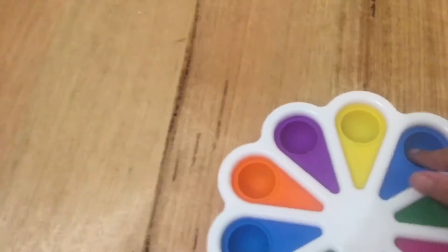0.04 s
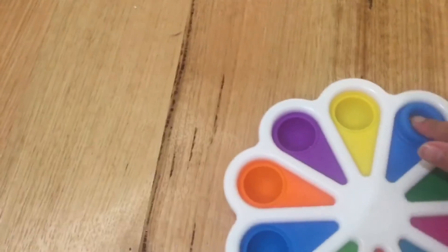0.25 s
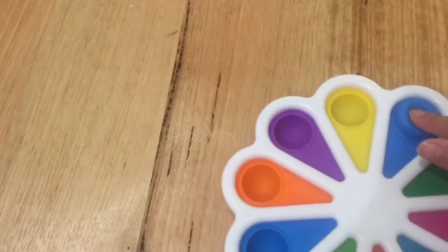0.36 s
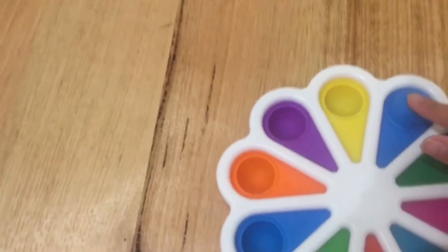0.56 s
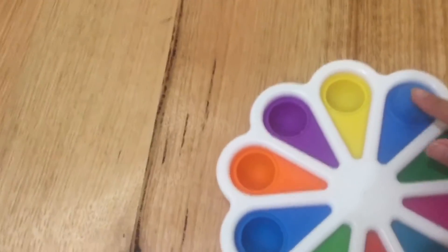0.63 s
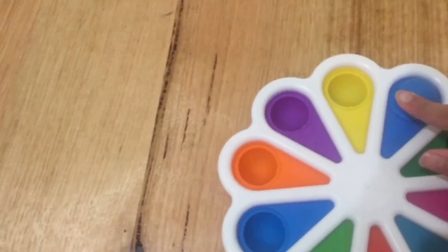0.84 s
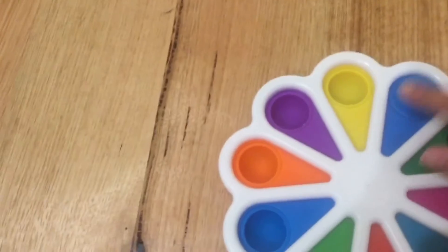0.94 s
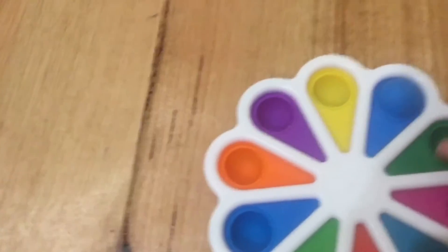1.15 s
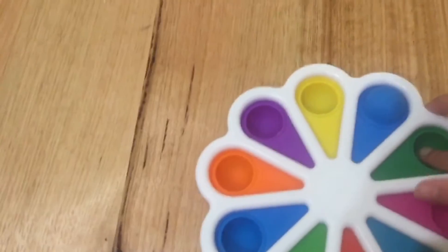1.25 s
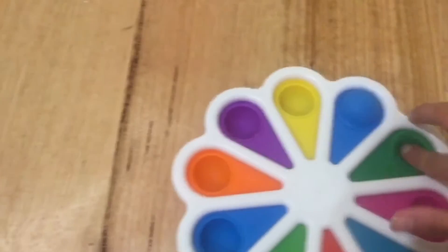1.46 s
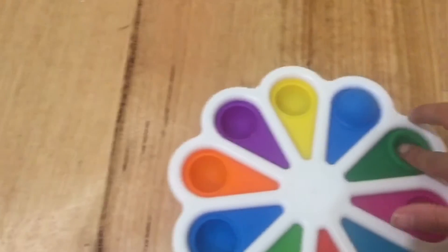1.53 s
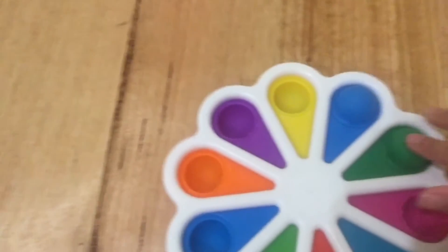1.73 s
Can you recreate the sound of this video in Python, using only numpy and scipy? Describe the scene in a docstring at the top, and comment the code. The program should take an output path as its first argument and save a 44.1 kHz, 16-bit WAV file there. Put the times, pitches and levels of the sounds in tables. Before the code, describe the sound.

Push-pop fidget toy played backwards: one loud pop swelling up, then faint crackles and knocks

```python
"""Silicone push-pop toy, reversed

A push-pop toy on a wooden table, close by, heard backwards: rings and room tails swell up to their blows.
One loud dome pop and three fainter ones, frame knocks and a fingertip tap are noise bursts that drive
decaying modes; skin crackles are filtered bursts; the table top thumps at low pitch. Noise shaped in
level and spectrum gives rubbing, rustle, narrow hisses and room air; swelling sine partials give a hum.
"""
import sys
import numpy as np
from scipy import signal
from scipy.fft import rfft, irfft
from scipy.io import wavfile
from scipy.ndimage import uniform_filter1d

SR = 44100
rng = np.random.default_rng(int(sys.argv[2]) if len(sys.argv) > 2 else 0)


def to_wav(sig):
    """Store sig (one row per channel, or 1-D mono) as 16-bit WAV at the path in sys.argv[1].

    Samples outside -1..1 are clipped; the rate is SR.
    """
    pcm = np.clip(np.atleast_2d(sig), -1, 1) * 32767
    pcm = np.round(pcm).astype(np.int16)
    wavfile.write(sys.argv[1], SR, pcm.T)  # frames by channels


def attenuation_scalar(level_db):
    """Turn a level in dB into a linear amplitude multiplier (20 dB per decade)."""
    decades = np.asarray(level_db, float) / 20
    return 10 ** decades


N = 79380
M = N + int(0.1 * SR)  # forward-running buffer, 0.1 s longer than the scene
TIME_S = np.arange(N) / SR


def band(x, hz, width_hz):
    """Two-pole resonant band-pass."""
    hz = min(hz, 0.4 * SR)
    return signal.lfilter(*signal.iirpeak(hz, hz / width_hz, fs=SR), x)


def unit(x):
    """Scale to rms 1."""
    return x / np.sqrt(np.mean(x ** 2))


def peak(x, db):
    """Scale to a peak level."""
    return attenuation_scalar(db) * x / np.abs(x).max()


def coloured(shape):
    """Noise of rms 1 with a (Hz, dB) spectrum, interpolated over log frequency."""
    freq_hz = np.fft.rfftfreq(N, 1 / SR) + 1
    shape_hz, shape_db = np.array(shape).T
    white = rng.standard_normal(N)
    gain = attenuation_scalar(np.interp(np.log(freq_hz), np.log(shape_hz), shape_db))
    return unit(irfft(rfft(white) * gain, N))


def walk(rate_hz):
    """Smooth random level, rms 1: noise averaged twice over 1 / rate_hz."""
    k = int(SR / rate_hz)
    return unit(uniform_filter1d(uniform_filter1d(rng.standard_normal(N), k), k))


def contour(points):
    """Level in dB at every sample, straight lines between (time, level) points."""
    return np.interp(TIME_S, *np.array(points).T)


def swell(start_s, end_s):
    """Half-sine rise and fall between two times."""
    return np.sin(np.pi * np.clip((TIME_S - start_s) / (end_s - start_s), 0, 1))


def ring(modes):
    """Impulse response of a struck body: decaying sine modes, peak 1."""
    t = np.arange(SR // 2) / SR
    y = sum(attenuation_scalar(db - 60 * t / t60_s) * np.sin(2 * np.pi * hz * t) for hz, db, t60_s in modes)
    return y / np.abs(y).max()


def burst(length_ms, rise_share=0.076):
    """Spray of micro-impacts under a Gaussian decay; the rise is a share of the length."""
    t = np.arange(SR // 10) / SR * 1000 / length_ms
    spray = rng.standard_normal(len(t)) * attenuation_scalar(3.5 * rng.standard_normal(len(t)))
    return spray * np.exp(-t ** 2) * np.clip(t / rise_share, 0, 1)


def add(out, at_s, x):
    """Place a forward-running sound whose start is heard at at_s when reversed."""
    i = M - int(at_s * SR)
    out[i:i + len(x)] += x[:M - i]


def room_tail(room_db):
    """Grainy diffuse tail that builds up after a gap; its treble starts stronger and dies sooner."""
    gap_s, t60_s, treble_t60_s, treble_db, split_hz = 0.015, 0.26, 0.17, 4.5, 3500
    # room spectrum: (frequency [Hz], level [dB per Hz])
    room_colour = [(120, -55.5), (200, -20), (832, -11.5), (912, -13.5), (1180, -3), (1640, -17.5),
                   (1970, -4), (2280, -17.5), (2780, -10), (3050, -23), (4310, -14.5), (5470, -23.5),
                   (15800, -26)]
    t = np.arange(SR // 2) / SR
    grainy = coloured(room_colour) * attenuation_scalar(1.5 * walk(250))
    air = grainy[:len(t)] * (1 - np.exp(-(t / gap_s) ** 2))
    low = signal.filtfilt(*signal.butter(2, split_hz, fs=SR), air)
    low_tail = low * attenuation_scalar(-60 * t / t60_s)
    treble_tail = (air - low) * attenuation_scalar(treble_db - 60 * t / treble_t60_s)
    return attenuation_scalar(room_db) * (low_tail + treble_tail)


def blows(events, modes, room_db, low_cut_hz=260):
    """Each snap rings the body, cracks in the treble and leaves a room tail."""
    crack_hz, crack_width_hz = 11000, 12000
    push_share = 0.67  # slower rise of the push that drives the body
    out = np.zeros(M)
    low_cut = signal.butter(2, low_cut_hz, "high", fs=SR)
    for at_s, db, length_ms, crack_db, tilt_db in events:
        tone = 0
        for mode in modes:
            hz, mode_db, _ = mode
            driven = signal.fftconvolve(burst(length_ms, push_share), ring([mode]))
            tone = tone + peak(driven, mode_db + tilt_db * np.log2(hz / 1000))
        crack = band(burst(length_ms), crack_hz, crack_width_hz)
        add(out, at_s, peak(signal.lfilter(*low_cut, tone), db))
        add(out, at_s, peak(crack, db + crack_db))
        add(out, at_s, room_tail(db + room_db))
    return out


def room_air():
    """Quiet room: coloured noise with a slight level drift."""
    # room air spectrum: (frequency [Hz], level [dB per Hz])
    air_colour = [(15, -53), (25, 3.5), (120, -4.5), (157, -8.5), (189, -9.5), (461, -12), (604, -15.5),
                  (857, -14), (1640, -20.5), (2030, -19), (15800, -23)]
    return attenuation_scalar(-68.5 + 0.68 * walk(8)) * coloured(air_colour)


def hum():
    """Swells of three harmonic sine partials, each wavering in level."""
    out = np.zeros(N)
    # hum swells: (start [s], end [s], fundamental [Hz], levels of partials 1, 2, 3 [dB])
    hum_swells = [(0.25, .38, 157, -66, -75, -79.5), (0.403, 0.583, 155.1, -68, -79.5, -73),
                  (.83, .95, 158.8, -66.5, -80, -88), (1.671, 1.753, 156, -65, -85, -85),
                  (1.713, 1.822, 156, -48, -75.5, -72)]
    for start_s, end_s, hz, *partial_db in hum_swells:
        for k, db in enumerate(partial_db, 1):
            level = attenuation_scalar(db + 2.0 * walk(12)) * swell(start_s, end_s)
            out += level * np.sin(2 * np.pi * k * hz * TIME_S)
    return out


def whistle():
    """Narrow hisses and a thin whistle: noise band-passed twice, swelling and fading."""
    out = np.zeros(N)
    # hisses: (start [s], end [s], centre [Hz], width of each pass [Hz], rms before the swell [dB])
    hisses = [(0.087, 0.126, 7200, 1800, -61.5), (0.039, 0.16, 2500, 2300, -63),
              (0.6, 0.87, 3570, 79, -71.5), (0.726, .825, 3700, 56, -71), (0.663, 0.82, 2925, 84, -70.5),
              (.66, 0.833, 3920, 350, -74.5), (.84, .92, 2650, 500, -69), (0.41, 0.74, 670, 700, -72.5),
              (1.40, 1.52, 1260, 250, -64), (1.73, 1.84, 2330, 1200, -64.5), (1.513, 1.57, 3660, 900, -64)]
    for start_s, end_s, hz, width_hz, db in hisses:
        once = band(rng.standard_normal(N), hz, width_hz)
        out += attenuation_scalar(db) * swell(start_s, end_s) * unit(band(once, hz, width_hz))
    return out


def rubbing():
    """Finger and frame rubbing: coloured noise with a fast grainy level."""
    # rubbing level: (time [s], level [dB])
    rub_level = [(0, -71), (.1, -70), (.3, -93.5), (.45, -74), (.5, -69), (.62, -69.5), (.7, -70),
                 (.74, -91), (1.0, -82.5), (1.1, -73), (1.13, -87.5), (1.27, -84), (1.31, -65.5),
                 (1.39, -69), (1.45, -67.5), (1.55, -58.5), (1.6, -50), (1.63, -85.5), (1.8, -59)]
    # rubbing spectrum: (frequency [Hz], level [dB per Hz])
    rub_colour = [(24, -32), (40, -5), (126, -7.5), (247, -18), (509, -20.5), (1050, -14), (1220, -15.5),
                  (2390, -20), (2990, -17), (4800, -29), (15500, -35)]
    return attenuation_scalar(contour(rub_level) + 2.8 * walk(79)) * coloured(rub_colour)


def rustle():
    """Dry treble rustle of skin on silicone: gritty noise through a wide band-pass."""
    # rustle level: (time [s], level [dB])
    rustle_level = [(0, -69), (.1, -66.5), (.14, -68), (.25, -57), (.27, -88), (.5, -70.5), (.7, -73),
                    (.8, -88), (1.28, -81.5), (1.32, -67.5), (1.4, -79), (1.5, -75.5), (1.555, -66),
                    (1.565, -60.5), (1.578, -49.5), (1.584, -59.5), (1.59, -52), (1.6, -60), (1.608, -46),
                    (1.613, -64), (1.64, -80.5), (1.8, -87)]
    grit = rng.standard_normal(N) * attenuation_scalar(2.5 * walk(300))
    return attenuation_scalar(contour(rustle_level)) * unit(band(grit, 13000, 13000))


def thumps():
    """The table top booms in its low modes, building up over a few milliseconds."""
    rise_s = 0.0051
    # table top modes: (frequency [Hz], level [dB], t60 [s])
    table_modes = [(64, 4, 0.17), (90, 4.5, 0.33), (110, 0, .2), (156, -7.5, .3)]
    # thumps: (time [s], level before the rise is applied [dB])
    thump_events = [(.235, -35), (.265, -45.5), (0.781, -62.5), (1.114, -56.5), (1.341, -55), (1.43, -49),
                    (1.491, -44), (1.55, -38.5), (1.61, -39.5), (1.69, -63), (1.81, -56)]
    out, boom = np.zeros(M), ring(table_modes)
    boom = boom * (1 - np.exp(-np.arange(len(boom)) / SR / rise_s))
    for at_s, db in thump_events:
        add(out, at_s, attenuation_scalar(db) * boom)
    return out


def ticks():
    """Skin peeling from the finger: short broad band-passed crackles."""
    out = np.zeros(M)
    # crackles: (time [s], peak level [dB], length [ms], centre [Hz])
    tick_events = [(.2352, -40.5, 1.7, 6460), (1.115, -43, 1.5, 6000), (1.6102, -35, 3.8, 13000),
                   (.2625, -32, 3, 13000), (.272, -82, 2, 5020), (.499, -64.5, 4, 6000),
                   (.565, -57, 3.5, 2925), (.609, -50, 1.84, 5950), (.626, -46.5, 1.5, 6955),
                   (.663, -65.5, 3, 8980), (.695, -56.5, 5, 3000), (1.329, -49, 14, 13500),
                   (1.3626, -44, 3, 5750), (1.5796, -38, .8, 5980), (1.5898, -31, 2, 11000),
                   (1.593, -26, .8, 8880), (1.620, -56, 2.88, 7950), (1.652, -57, 2.6, 6050)]
    for at_s, db, length_ms, hz in tick_events:
        add(out, at_s, peak(band(burst(length_ms), hz, 1.3 * hz), db))
    return out


def taps():
    """A fingertip tap rings the modes of the wood."""
    # taps: (time [s], peak level [dB], snap length [ms], treble crack re tap [dB], tilt [dB per octave])
    tap_events = [(1.115, -41.5, 0.88, -3.5, 0)]
    # wood modes: (frequency [Hz], peak level [dB], t60 [s])
    wood_modes = [(128, -10, 0.14), (220, -5, .06), (390, -3.5, 0.095), (575, -1, 0.027), (744, 3, 0.028),
                  (960, -10.5, 0.018), (1690, -3.5, 0.012), (2730, -7.5, 0.012)]
    return blows(tap_events, wood_modes, room_db=-31.5, low_cut_hz=79)


def knocks():
    """The frame knocks on the table and rings in its own modes."""
    # knocks: (time [s], peak level [dB], snap length [ms], treble crack re knock [dB], tilt [dB per octave])
    knock_events = [(1.414, -47.5, 3.8, -22.5, -1), (1.4905, -42, 6, -25, -2), (1.539, -39.5, 6, -20, -0.5),
                    (1.551, -32.5, 5.2, -17.5, -1), (1.577, -37, 3.76, -18, 2),
                    (1.5815, -40.5, 1.45, -3, -11.5), (1.5915, -42, 3.1, -2.5, 3),
                    (1.6105, -32.5, 3, -0.5, -1.5)]
    # frame modes: (frequency [Hz], peak level [dB], t60 [s])
    frame_modes = [(530, -6.5, 0.051), (724, -7.5, 0.014), (942, 0.5, 0.026), (1215, -5, 0.039),
                   (1470, 4, 0.021), (1960, -5.5, .015), (2900, 4.5, 0.01), (3474, 3.5, 0.015),
                   (3740, -5.5, 0.01), (5100, -6.5, 0.0087)]
    return blows(knock_events, frame_modes, room_db=-31.5)


def pops():
    """A dome snaps through and rings in short, heavily damped modes."""
    # pops: (time [s], peak level [dB], snap length [ms], treble crack re pop [dB], tilt [dB per octave])
    pop_events = [(.2503, -8, 3, -6, 0), (0.21, -34.5, 2, -1.5, 2), (.2635, -31.5, 3, 1, -4),
                  (1.815, -29, 6.3, -18.5, 2.5)]
    # dome modes: (frequency [Hz], peak level [dB], t60 [s])
    dome_modes = [(384.8, -9.5, 0.027), (800, -9, 0.025), (950, -8.5, 0.015), (1126, -1.5, .016),
                  (1200, -18, 0.053), (1570, -5.5, .018), (1985, 5.5, 0.012), (2000, -24.5, .1),
                  (2600, -16.5, .012), (2910, -6.5, 0.023), (3320, -12, .012), (3970, -9, .012),
                  (4150, -12.5, .012), (4400, -6.5, .01), (5366, -7.5, .01)]
    return blows(pop_events, dome_modes, room_db=-25.5)


def scene():
    """Blows, crackles and thumps run forwards, are reversed, then join the background."""
    near = pops() + knocks() + ticks() + thumps() + taps()
    background = room_air() + rubbing() + rustle() + whistle() + hum()
    return (near[::-1][:N] + background)[None]


def band_limit(x):
    """A steep low-pass at the top of the band."""
    return signal.sosfilt(signal.butter(12, 16470, fs=SR, output="sos"), x)


def record(dry):
    """Pass on the finished mix."""
    return band_limit(dry)


dry = scene()
out = record(dry)
to_wav(out)
```